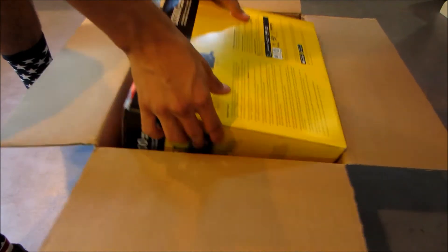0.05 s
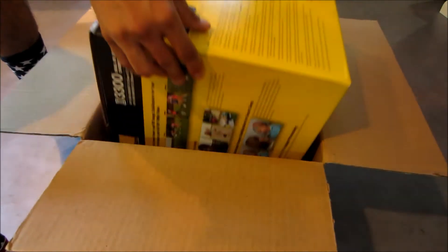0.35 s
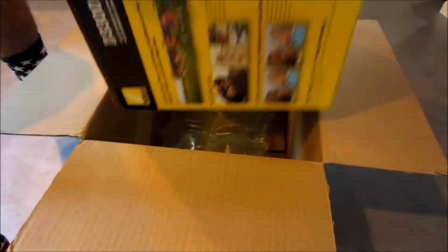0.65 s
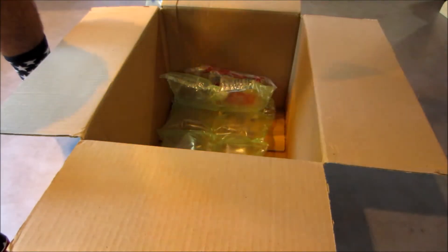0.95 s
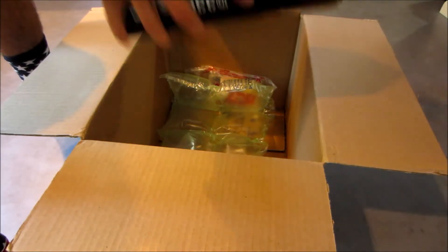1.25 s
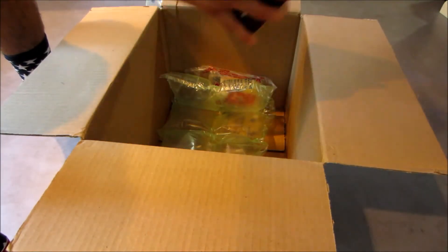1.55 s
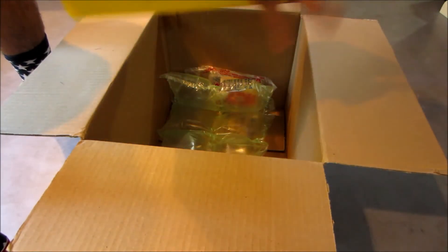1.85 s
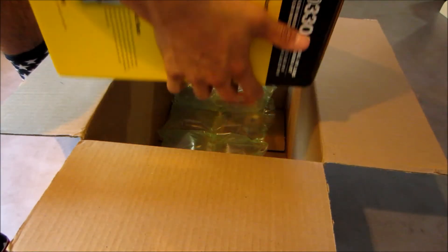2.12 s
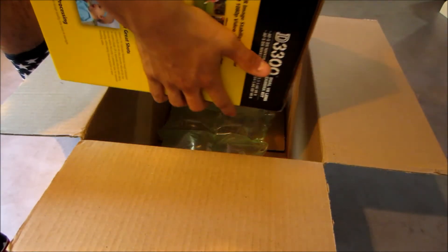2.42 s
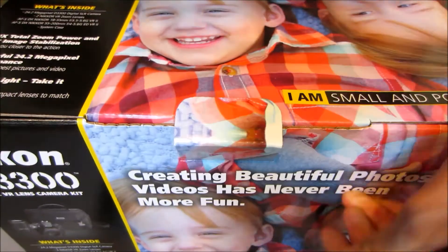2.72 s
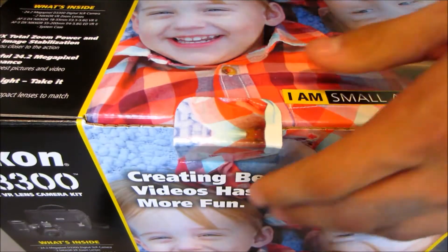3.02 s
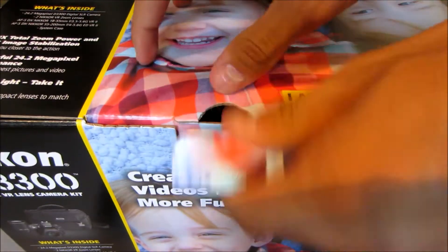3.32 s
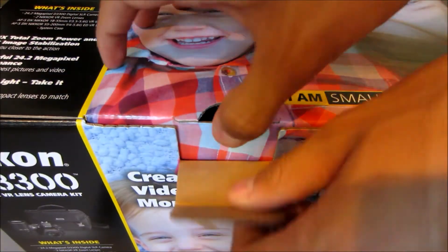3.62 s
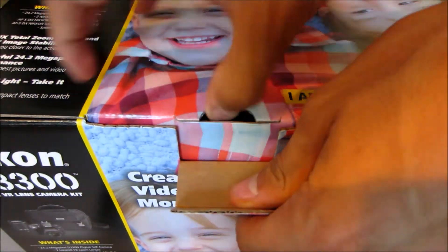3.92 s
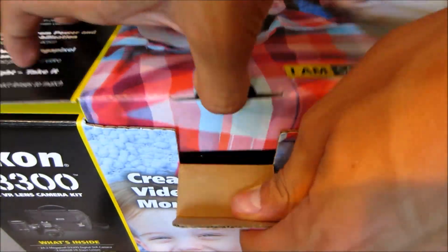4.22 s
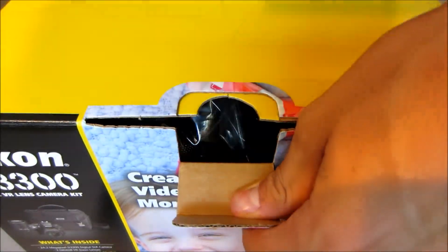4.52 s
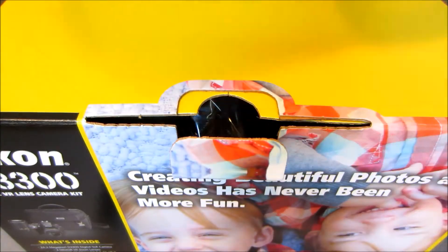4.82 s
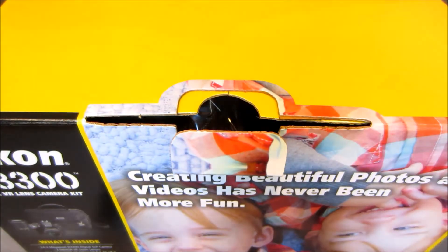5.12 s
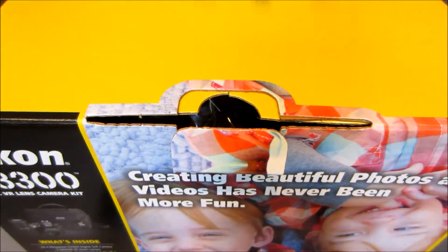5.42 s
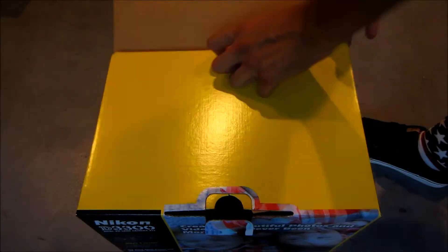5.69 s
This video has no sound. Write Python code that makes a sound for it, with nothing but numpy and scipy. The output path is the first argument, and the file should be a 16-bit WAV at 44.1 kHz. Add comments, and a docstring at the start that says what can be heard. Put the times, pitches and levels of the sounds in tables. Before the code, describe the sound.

Close handling of cardboard boxes in a small room, with hollow thumps, dry scrapes, taps and a few brief squeaks.

```python
"""Cardboard rustles, scrapes and knocks as a boxed product is lifted out of a shipping carton; the box
is turned over, its tab pulled and its lid flipped open. Stick-slip friction makes the rubbing, scrapes
and squeaks; impacts launch bending waves that ring in the panels; broad pushes make the walls and the
enclosed air boom. One close microphone hears it all in a small hard-floored room."""
import sys
import numpy as np
from scipy import signal
from scipy.fft import rfft, irfft
from scipy.io import wavfile

SR = 44100
rng = np.random.default_rng(int(sys.argv[2]) if len(sys.argv) > 2 else 0)


def materialize(psi):
    """Save the field psi as 16-bit PCM at rate SR to the path in sys.argv[1].

    A 1-D psi becomes a single channel; in a 2-D psi each row is a channel.
    """
    bounded = np.clip(np.atleast_2d(psi).T, -1, 1)
    quanta = np.round(bounded * 32767).astype(np.int16)
    wavfile.write(sys.argv[1], SR, quanta)


N = 262395
TIME = np.arange(N) / SR
HELD_S = 2.8  # from here on the box is out of the carton and held close


def amp(db):
    """Amplitude ratio of a level in decibels."""
    return 10 ** (np.asarray(db) / 20)

def unit(x):
    """Normalisation to unit energy."""
    return x / np.sqrt(np.sum(x ** 2) + 1e-18)

def add(out, t, x):
    """Superposition: mix x into out from time t, or from 0 if t is negative."""
    i = max(int(t * SR), 0)
    out[i:i + len(x)] += x[:max(N - i, 0)]

def on_log(f, points):
    """Interpolation of (Hz, value) points on a log-frequency axis."""
    hz, value = np.transpose(points)
    return np.interp(np.log(f + 1), np.log(hz), value)

def response(*spectra, size=2048):
    """Minimum-phase, unit-energy impulse response of (Hz, dB) spectra in series."""
    f = np.fft.rfftfreq(size, 1 / SR)
    cepstrum = irfft(np.log(amp(sum(on_log(f, s) for s in spectra))))
    cepstrum[1:size // 2] *= 2
    cepstrum[size // 2 + 1:] = 0
    return unit(irfft(np.exp(rfft(cepstrum))))

def band(x, lo_hz, hi_hz, order=3):
    """Band-pass filter."""
    return signal.sosfilt(signal.butter(order, [lo_hz, hi_hz], "band", fs=SR, output="sos"), x)

def wander(n, rate):
    """Random modulation: `rate` normal values a second, joined by straight lines."""
    knots = rng.standard_normal(2048)
    return np.interp(np.arange(n) / SR * rate, np.arange(len(knots)), knots)

def damped(modes):
    """Free vibration: a sum of decaying sines from rows of (Hz, dB, t60 s)."""
    t = np.arange(SR // 2) / SR
    return sum(np.sin(2 * np.pi * hz * t) * amp(db - 60 * t / t60) for hz, db, t60 in modes)


# Frequency response of corrugated board: (frequency [Hz], gain [dB])
BOARD_SPECTRUM = [(40, -4), (120, 1), (250, 2.5), (450, -1), (1000, -4.5), (1500, -6.5), (2200, -10.5),
                  (4200, -22.5), (7000, -23.5), (10000, -34), (12000, -51.5), (15500, -51)]
# Centres of the thud, body, snap and tick registers: (frequency [Hz])
REGISTER_CENTRES = [230, 720, 2200, 6000]

def board(thud_db, snap_db, tick_db, lag_s=.0004):
    """Dispersion: bending waves carry highs faster than lows; lag_s is the group delay at 1 kHz."""
    contact = [(45, thud_db / 4), *zip(REGISTER_CENTRES, (thud_db, 0, snap_db, tick_db))]
    colour = response(BOARD_SPECTRUM, contact)
    f = np.fft.rfftfreq(len(colour), 1 / SR)
    return irfft(rfft(colour) * np.exp(-4j * np.pi * lag_s * np.sqrt(1000 * f)))

def flap(x, hz, q, db):
    """Local resonance: the patch of card under the contact adds a peak of its own."""
    return x + amp(db) * signal.lfilter(*signal.iirpeak(hz, q, fs=SR), x)


# Hands and sleeves on the card, lifting and then opening:
# (time [s], rustle level [dB], rumble level [dB], hiss level [dB])
RUB_LIFTING = [(0.0, -30.5, -34, -46), (0.29, -49, -45.5, -53.5), (0.44, -48.5, -44.5, -67),
               (0.65, -53.5, -49.5, -66.5), (1.21, -49.5, -42, -63), (1.38, -45.5, -43, -60),
               (1.6, -46, -51, -67), (1.79, -48, -42.5, -56), (1.99, -38, -37, -56),
               (2.26, -46.5, -48.5, -64.5), (2.44, -52.5, -45.5, -62.5), (2.62, -53.5, -52, -63),
               (2.81, -62.5, -61, -75.5), (3.05, -88.5, -79, -91)]
RUB_OPENING = [(3.1, -77, -74.5, -93), (3.23, -64.5, -66, -73), (3.36, -57, -54.5, -61),
               (3.52, -63.5, -54, -73), (3.73, -52.5, -49, -64.5), (4.08, -59.5, -52.5, -68),
               (4.27, -47, -43.5, -56), (4.46, -49.5, -49.5, -66), (4.69, -59.5, -48, -60.5),
               (4.96, -55, -52.5, -79), (5.34, -55, -48, -55), (5.74, -57.5, -52.5, -72.5),
               (5.86, -56, -49, -68), (5.95, -43, -45, -54)]

def rub_db(t):
    """Level envelopes of the rustle, rumble and hiss at time t."""
    times, *levels = np.transpose([*RUB_LIFTING, *RUB_OPENING])
    return [np.interp(t, times, db) for db in levels]

def slips(n, rate, spread_db, smooth):
    """Stick-slip force, rms 1: fibres let go in uneven clicks, `rate` a second, over a smooth hiss."""
    sizes = amp(spread_db * np.minimum(rng.exponential(size=n), 4)) * rng.choice([-1, 1], n)
    clicks = sizes * (rng.random(n) < rate / SR)
    return unit(unit(clicks) + smooth * unit(rng.standard_normal(n))) * np.sqrt(n)

def rubbing(rustle_gain_db=-2, rumble_gain_db=-3, hiss_gain_db=0.5):
    """Sliding friction: skin with an unsteady grip drives the board, heard in three bands."""
    rustle_db, rumble_db, hiss_db = rub_db(TIME)
    force = slips(N, rate=900, spread_db=1.0, smooth=1.0) * amp(2.5 * wander(N, rate=45))
    card = signal.fftconvolve(force, board(0, 0, 0))[:N]
    layers = [(band(card, 320, 3000), rustle_db + rustle_gain_db),
              (band(card, 23, 380), rumble_db + rumble_gain_db),
              (band(card, 2470, 17000), hiss_db + hiss_gain_db)]
    return sum(unit(x) * np.sqrt(N) * amp(db) for x, db in layers)


# Strokes on the card, card on card except a finger's rub at 3.215 s: (crest time [s], half of the rise [s],
# half of the fall [s], level [dB], thud gain [dB], edge gain [dB], flap resonance [Hz])
STROKES = [(0.026, 0.026, 0.058, -29, 8, -7, 940), (0.369, 0.053, 0.1, -27.5, 5.5, 5, 1080),
           (0.987, 0.047, 0.06, -36.5, -0.5, 5, 330), (1.165, 0.01, 0.016, -23, 23, -9, 338),
           (1.478, 0.044, 0.11, -30, 1, -12.5, 707), (1.841, 0.057, 0.08, -27.5, 11, -3.5, 1890),
           (2.179, 0.031, 0.05, -29, 20.5, 6.5, 1240), (2.26, 0.051, 0.032, -44, -2, 17, 429),
           (3.215, 0.029, 0.062, -59, 7, 9, 610), (3.473, 0.016, 0.048, -45.5, -9, 9, 640),
           (3.625, 0.027, 0.1, -41, 5.5, 10, 560), (3.795, 0.015, 0.024, -36.5, -17, 9, 2400),
           (3.827, 0.022, 0.023, -31.5, -13, 4.5, 492), (4.056, 0.018, 0.026, -35.5, 5.5, 3.5, 410),
           (4.229, 0.008, 0.073, -27.5, -2, 12, 590), (4.345, 0.085, 0.057, -28, 4.5, 6.5, 1040),
           (4.381, 0.011, 0.03, -29.5, 1, 8.5, 1020), (4.729, 0.025, 0.015, -34, 6.5, 9, 1090),
           (4.954, 0.013, 0.05, -32.5, 0, 1.5, 2700), (4.973, 0.012, 0.017, -20, -17, -0.5, 710),
           (5.4, 0.11, 0.089, -42.5, -11, -2, 455), (5.758, 0.022, 0.065, -31, 2, -8.5, 1560),
           (5.885, 0.0083, 0.051, -32, -3, 0.5, 412)]

def scrapes(gain_db=-3, snap_db=-2, tick_db=2, catches_per_s=220, catch_db=3.2):
    """Stick-slip friction: a stroke bites harder up to its crest, catching unevenly, then lets go."""
    out = np.zeros(N)
    t = np.arange(SR // 2) / SR
    for crest, rise, fall, db, thud_db, edge_db, flap_hz in STROKES:
        force = slips(len(t), rate=1800, spread_db=0.5, smooth=0.43)
        stages = [-2 * rise, -rise, 0, fall, 2 * fall]
        pressure_db = np.interp(t - 2 * rise, stages, [-32, -10, 0, -17, -80])
        force *= amp(db + gain_db + pressure_db + catch_db * wander(len(t), catches_per_s))
        fizz_db = -4 if crest < HELD_S else 5  # the finest fibres fizz, most on the box's cut edges
        force += amp(fizz_db) * band(force, 10500, 21000, order=2)
        colour = flap(board(thud_db, edge_db + snap_db, edge_db + tick_db), flap_hz, q=5, db=7.5)
        add(out, crest - 2 * rise, signal.fftconvolve(force, unit(colour)))
    return out


def finger_taps(per_s=6, above_rustle_db=0.5, scatter_db=0.5):
    """Random impacts of a shifting grip, as strong as the rubbing; returns rows like those of IMPACTS."""
    thud_db, edge_db, ring_db, spot_hz = 8, 5, 2, 480
    rows = []
    for when, softness, spot in rng.random((int(per_s * N / SR), 3)):
        start = when * N / SR
        db = rub_db(start)[0] + above_rustle_db + scatter_db * (1 - 2 * softness)
        rows.append((start, db, thud_db, edge_db, ring_db, spot_hz * 2 ** (spot - .5)))
    return rows

# An edge or a finger strikes the card; soft contacts thud, hard edges snap and tick: (time [s],
# level [dB], thud gain [dB], edge gain [dB], ring relative to push [dB], spot resonance [Hz])
IMPACTS = [(0.0209, -25, 4.5, -6, 13.5, 950), (0.055, -29, 16, 4, 12, 1290), (0.2823, -34, -41, -2, 1, 610),
           (0.3253, -27, 8.5, 6, 1, 540), (0.3654, -19, -12, -8.5, -1, 2100),
           (0.641, -30, 8.5, 4.5, 2, 680), (0.663, -31, 10, -2, 4, 586), (0.679, -39, 2, 10, -5, 424),
           (0.7839, -27.5, -5.5, -2, -3, 725), (0.822, -28, 0, -2.5, 3.5, 870),
           (0.9133, -36, 10, -2, -4, 3020), (0.9613, -25.5, -1, 2, -7.5, 336),
           (1.0142, -46, -6, 13, -16, 550), (1.03, -35, 8, 1, 20, 960),
           (1.1457, -24.5, -10, -6.5, 0.5, 330), (1.1795, -18.5, 4, -7.5, -20, 393),
           (1.1976, -26.5, 5.5, 1, -2.5, 2780), (1.267, -22, -3.5, -6.5, 2.5, 393),
           (1.3459, -31, 16, 12, -13, 380), (1.3716, -34.5, 3, -5, -19, 330),
           (1.4005, -31, 3.5, -4, 12, 343), (1.4281, -24.5, -10.5, -12.5, -3.5, 352),
           (1.507, -29, 3, 4, -0.5, 1520), (1.6681, -35.5, 16, 1, 4, 1500), (1.778, -32.5, 22, 4, 12, 800),
           (1.859, -20, -6.5, -4.5, -3.5, 438), (1.923, -29, -1, 0, 3, 694), (2.286, -34.5, 43, 29, 3, 367),
           (2.3834, -36, 22.5, 14.5, 1, 365), (2.417, -32.5, 18, 8, 1.5, 358),
           (2.6714, -38, 1, 9.5, 21, 1300), (3.3633, -49, 5, -0.5, -1, 580),
           (3.424, -50, 31.5, 28, -28, 880), (3.9137, -47.5, 21, 14, -8, 550),
           (4.0489, -42, 1.5, 12.5, 10, 388), (4.0962, -45.5, -12, -4, -4, 593),
           (4.2227, -29.5, -1, 2, 3, 390), (4.4937, -44.5, -11, -10, -9, 600),
           (4.5934, -46, -9, 3, -3, 526), (4.6124, -47, 2, 5, -2, 520), (4.6619, -43.5, 6, 13, 3, 690),
           (4.9725, -21, -27, -10.5, -7, 1110), (5.0099, -18, -9.5, -6.5, -6.5, 357),
           (5.401, -33, 0, -20, 1, 468), (5.459, -41, 25, 5, -4, 463), (5.6682, -18, -3, -9, -6, 1370),
           (5.715, -30.5, 21, 16, 28, 414), (5.7463, -31.5, 14, 23, -5, 500), (5.877, -29, 1, 2.5, 4, 830)]

def knocks(low_t60=0.097, high_t60=0.12, flight_s=0.0003, rebound_s=.011, rebound_db=-11.5):
    """Impact excitation: a sharp push, then bending waves reflect from the folds as a short, dense ring."""
    scuff_s, crush_s, equivalent_duration_s = 0.0021, 0.0018, 0.0095
    out = np.zeros(N)
    t = np.arange(-(SR // 125), SR // 5) / SR
    # a struck flap falls back once, softer
    contacts = [(np.maximum(t, 0), 0), (np.maximum(t - rebound_s, 0), rebound_db)]
    low_fade, high_fade = (
        sum(amp(db - 60 * age / t60) * (1 - np.exp(-(age / flight_s) ** 2)) for age, db in contacts)
        for t60 in (low_t60, high_t60))
    for start, db, thud_db, edge_db, ring_db, spot_hz in IMPACTS + finger_taps():
        colour = flap(board(thud_db, snap_db=edge_db + 1, tick_db=edge_db - 1), spot_hz, q=8.1, db=7)
        noise = rng.standard_normal(len(t))
        low, high = band(noise, 98, 2800), band(noise, 2200, 19000)
        scuff = amp(-6) * unit(high * amp(-8 * np.abs(t) / scuff_s))
        crush = amp(-12) * unit(low * np.exp(-(t / crush_s - 1) ** 2))  # the flutes give way
        push = (t == 0) + scuff + crush
        waves = low * low_fade + amp(-4) * high * high_fade
        direct = unit(signal.fftconvolve(push, colour))
        ring = amp(ring_db) * unit(signal.fftconvolve(waves, colour))
        add(out, start + t[0], amp(db) * unit(direct + ring) * np.sqrt(equivalent_duration_s * SR))
    return out


def ringing(x, modes, t60):
    """Modal response: every push in x leaves a panel ringing at its natural frequencies."""
    t = np.arange(SR // 3) / SR
    fade = amp(-60 * t / t60)
    tones = sum(amp(db) * np.cos(2 * np.pi * hz * t) for hz, db in modes)
    return signal.fftconvolve(x, tones * fade * 2 / fade.sum())[:N]

# Panel modes of the shipping carton and of the product box: (frequency [Hz], gain [dB])
CARTON_PANEL_MODES = [(525, -2.5), (670, -5), (790, 1.5), (945, -16), (1062, -5.5), (1107, -13),
                      (1227, 0.5), (1303, -6), (1830, -0.5), (2170, -7)]
BOX_PANEL_MODES = [(385, -10), (565, -9), (694, -6), (900, 0.5), (1010, -55), (1109, -31.5), (1269, -13),
                   (1560, -37), (2261, -2), (2945, -32), (3860, -32)]

def panels(x, carton_db=-2, box_db=-3):
    """Forced vibration: the contacts drive the carton's panels first, the box's once it is held close."""
    held = np.clip((TIME - HELD_S) / .1, 0, 1)
    carton = ringing(x * (1 - held), CARTON_PANEL_MODES, t60=0.16)
    box = ringing(x * held, BOX_PANEL_MODES, t60=0.12)
    return x + amp(carton_db) * carton + amp(box_db) * box


# Reverberation time of the room: (frequency [Hz], t60 [s])
REVERB_TIMES = [(150, 0.26), (500, 0.3), (1500, 0.23), (4000, 0.26), (10000, 0.16)]

def room(x, wet_db=-12, build_s=0.0022):
    """Reverberation: diffuse reflections build up quickly and decay exponentially, band by band."""
    t = np.arange(int(.7 * SR)) / SR
    noise = rng.standard_normal(len(t))
    edges = np.geomspace(50, 17000, 9)
    tail = sum(band(noise, lo, hi) * amp(-60 * t / on_log(np.sqrt(lo * hi), REVERB_TIMES))
               for lo, hi in zip(edges, edges[1:]))
    tail = unit(tail * (1 - np.exp(-(t / build_s) ** 2)))
    walls = response([(150, -4), (1000, 0.011), (8000, 0)])
    return amp(wet_db) * signal.fftconvolve(x, signal.fftconvolve(tail, walls))[:N]


# Spectrum of the room air, and the microphone's treble response: (frequency [Hz], gain [dB])
AIR_SPECTRUM = [(15, -34), (25, 2), (118, 1), (202, -9), (363, 0.5), (573, -15), (833, -18.5),
                (4620, -38.5), (15000, -40.5)]
MIC_TREBLE = [(4000, -0.5), (9000, 1), (12000, -7)]

def room_air(db=-71):
    """Stationary noise: the quiet air of the room, its top dulled by the microphone."""
    return amp(db) * signal.fftconvolve(rng.standard_normal(N), response(AIR_SPECTRUM, MIC_TREBLE))[:N]


# Low modes of the walls and enclosed air, carton and box: (frequency [Hz], gain [dB], t60 [s])
CARTON_BODY_MODES = [(106, -1, .12), (126, 0, .15), (229.5, 0, .18), (345, 0, .12)]
BOX_BODY_MODES = [(53.8, 0, 0.156), (118, 0, 0.14), (173.6, 0, 0.19), (280.4, 0.5, 0.2)]
# The whole box bumps or is pressed; a briefer push is higher in pitch:
# (time [s], level [dB], push frequency [Hz], swing relative to push [dB])
PUSHES = [(.055, -27.5, 215, 9), (0.324, -27.5, 221, 7), (.367, -28, 225, 8.5), (0.825, -23.5, 218, -5.5),
          (.9762, -11.5, 352, -19), (1.1636, -17.5, 128, -0.5), (1.1691, -2, 217, -21),
          (1.1791, -2.5, 194, -18.5), (1.453, -30, 360, 8), (1.81, -32.5, 99, 5), (1.8596, -21.5, 226, 0.5),
          (2.286, -37, 114.2, -4), (3.183, -47.5, 110, -2.5), (3.639, -47, 191, 14), (4.223, -31, 300, 0.5),
          (5.009, -21.5, 157, 6), (5.007, -19, 62, 5), (5.705, -31, 66, 9)]

def bumps(push_cycles=4.5, rise_cycles=0.23, loss_one_octave_off_db=24):
    """Resonance: a broad push dies in a few cycles and swings most the modes near its own frequency."""
    out = np.zeros(N)
    for start, db, push_hz, swing_db in PUSHES:
        modes = CARTON_BODY_MODES if start < HELD_S else BOX_BODY_MODES
        swings = [(hz, swing_db + gain_db - loss_one_octave_off_db * np.log2(hz / push_hz) ** 2, t60)
                  for hz, gain_db, t60 in modes]
        boom = damped([(push_hz, 0, push_cycles / push_hz), *swings])
        onset = 1 - np.exp(-(TIME[:len(boom)] * push_hz / rise_cycles) ** 2)
        add(out, start, amp(db) * boom * onset)
    return out


# Card chattering as it drags:
# (centre time [s], half-length [s], slip rate [1/s], flap resonance [Hz], level [dB])
CHATTER = [(1.466, 0.034, 230, 351, -45), (2.271, 0.009, 1100, 3230, -49), (3.477, 0.023, 650, 1280, -57),
           (3.8, 0.019, 700, 2500, -46.5), (4.351, 0.013, 330, 1020, -41.5), (4.435, 0.023, 505, 1060, -44)]

def squeaks(jitter=.08):
    """Quasi-periodic stick-slip: the slips fall roughly into step and drive one flap in a raspy squeak."""
    out = np.zeros(N)
    colour = board(thud_db=-27, snap_db=20, tick_db=1.2)
    for centre, half_s, slip_rate, flap_hz, db in CHATTER:
        t = np.arange(-3 * half_s, 3 * half_s, 1 / SR)
        cycles = np.cumsum(slip_rate * (1 + jitter * wander(len(t), rate=720))) / SR
        pulses = np.diff(np.floor(cycles), prepend=0) * amp(1.2 * wander(len(t), rate=260))
        card = signal.fftconvolve(pulses - pulses.mean(), colour)[:len(t)]
        tone = unit(flap(card, flap_hz, q=15, db=13)) * np.sqrt(len(t))
        add(out, centre + t[0], amp(db) * tone * np.exp(-(t / half_s) ** 2))
    return out


# Modes of the hollow box, tapped as it is turned: (frequency [Hz], gain [dB], t60 [s])
TAPPED_BOX_MODES = [(1265, -2, 0.31), (1370, -6, 0.25), (1513, -5, 0.23), (1646, -9.5, 0.24),
                    (2950, -3, 0.15)]

def hollow_tap(start_s=2.671, db=-43.5, blur_hz=160):
    """Light damping: held by its edges, the box rings on, each pitch blurred into a papery cluster."""
    out = np.zeros(N)
    for mode in TAPPED_BOX_MODES:
        ring = damped([mode])
        add(out, start_s, amp(db) * ring * wander(len(ring), rate=blur_hz))
    return out


def hum(hz=296, width_hz=24, db=-57):
    """Narrow-band noise has a pitch: a faint hollow hum hangs around the opened box."""
    noise = band(rng.standard_normal(N), hz - width_hz / 2, hz + width_hz / 2, order=2)
    fade = np.interp(TIME, [4.4, 4.8, 5.5, 5.7], [0, 1, 1, 0])
    return amp(db) * unit(noise) * np.sqrt(N) * fade


# Glossy card squealing:
# (centre time [s], half-length [s], frequency [Hz], relative glide [1/s], level [dB])
GLOSS_SQUEALS = [(4.442, .014, 2940, 0, -42.5), (5.605, 0.025, 5240, -2, -69), (5.651, 0.01, 5900, 9, -72),
                 (5.75, 0.0011, 6370, -7, -26.5), (5.777, 0.056, 6350, 0.5, -51.5)]

def squeals(jitter=0.0575):
    """Self-excited oscillation: fast stick-slip on the glossy coat gives a thin, unsteady high note."""
    out = np.zeros(N)
    for centre, half_s, hz, glide, db in GLOSS_SQUEALS:
        t = np.arange(-3 * half_s, 3 * half_s, 1 / SR)
        pitch_hz = hz * (1 + glide * t + jitter * wander(len(t), rate=580))
        tone = np.sin(2 * np.pi * np.cumsum(pitch_hz) / SR)
        add(out, centre + t[0], amp(db) * tone * np.exp(-(t / half_s) ** 2))
    return out


def scene():
    """Superposition of the cardboard's direct sound, its reflections and the quiet room."""
    card = panels(knocks() + scrapes() + rubbing()) + squeaks() + squeals()
    body = bumps() + hollow_tap()
    air = room_air()
    send_db = np.interp(TIME, [HELD_S, 3.2], [0, -3])  # held close, the box stands out from the room
    reflections = room((card + amp(3.5) * body) * amp(send_db))
    return (card + body + reflections + hum() + air)[None]

def record(dry, ceiling=0.47, low_cut_hz=27, top_hz=15900):
    """Band limiting and soft saturation: the recorder sheds rumble, rounds the peaks and cuts the top."""
    x = signal.sosfilt(signal.butter(1, low_cut_hz, "high", fs=SR, output="sos"), dry)
    rounded = x / (1 + (x / ceiling) ** 6) ** (1 / 6)
    return signal.sosfilt(signal.ellip(8, .2, 70, top_hz, fs=SR, output="sos"), rounded)


dry = scene()
out = record(dry)
materialize(out)
```